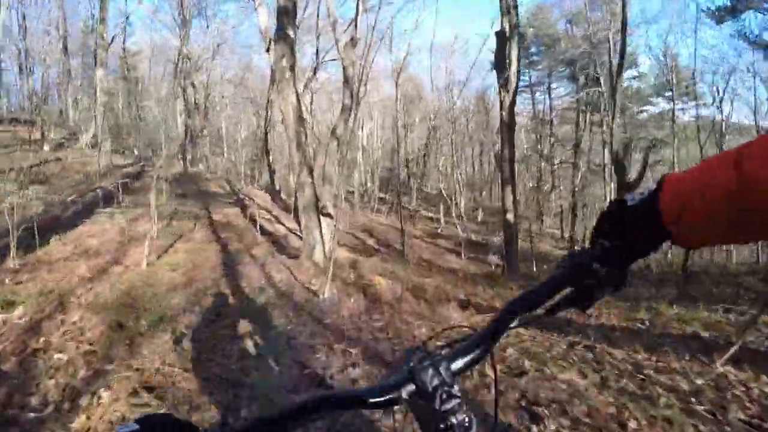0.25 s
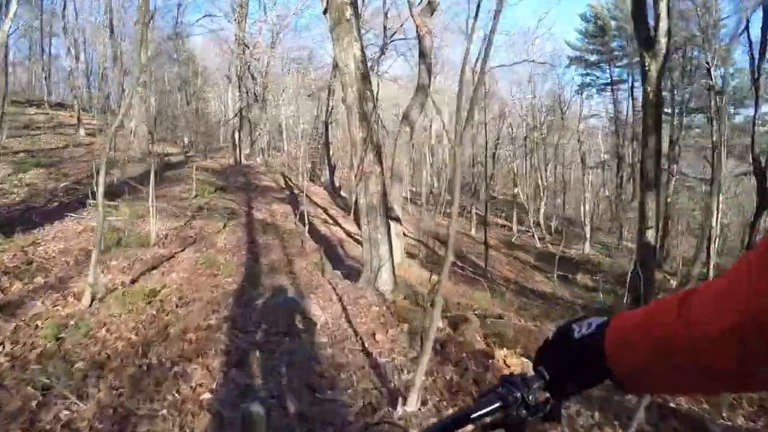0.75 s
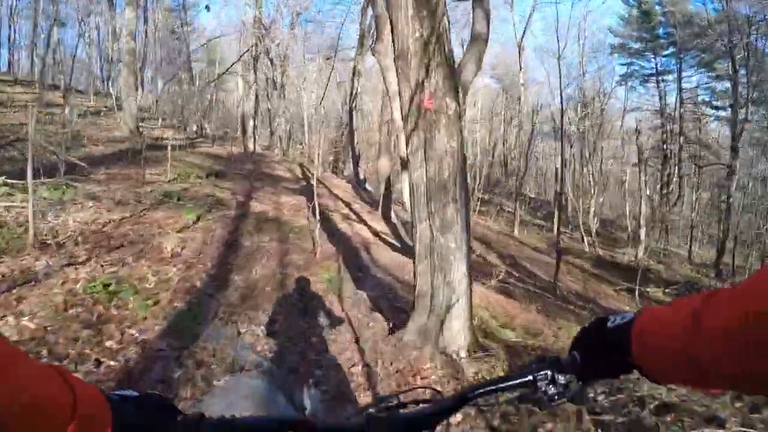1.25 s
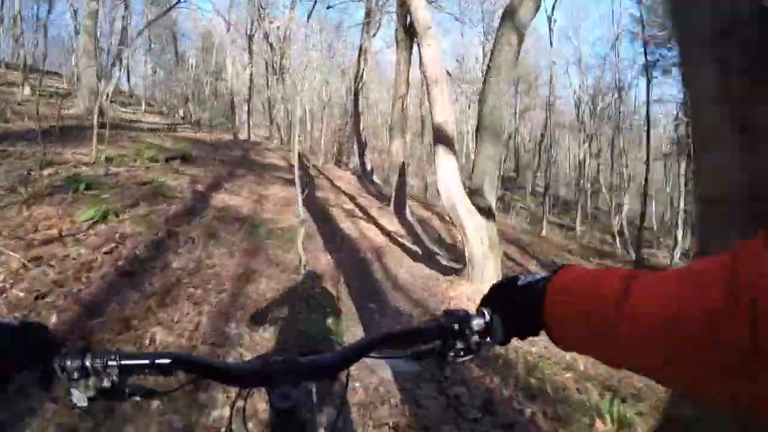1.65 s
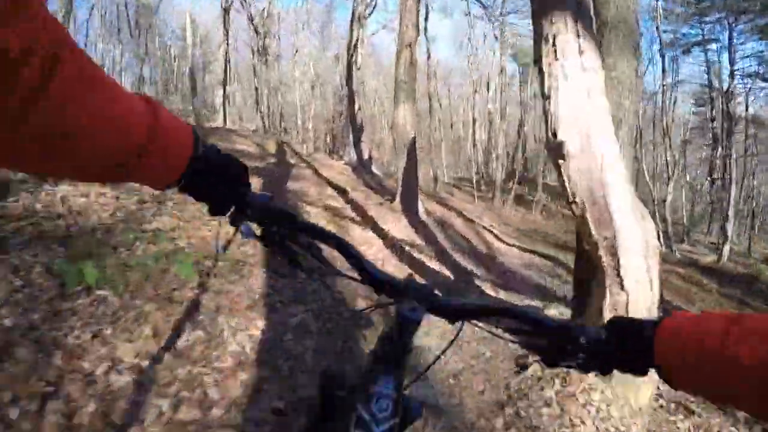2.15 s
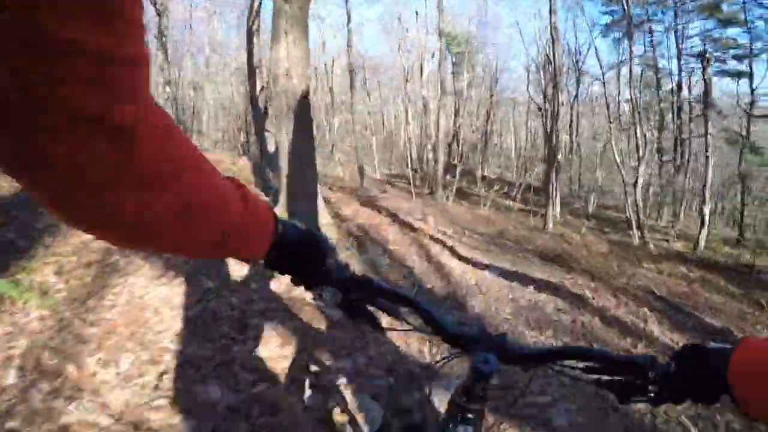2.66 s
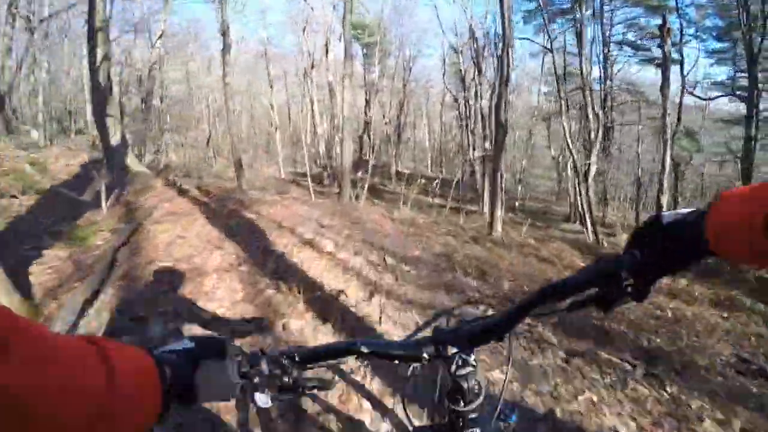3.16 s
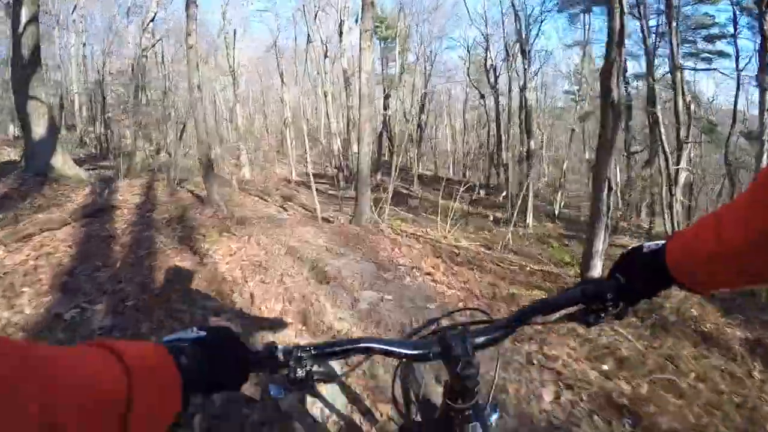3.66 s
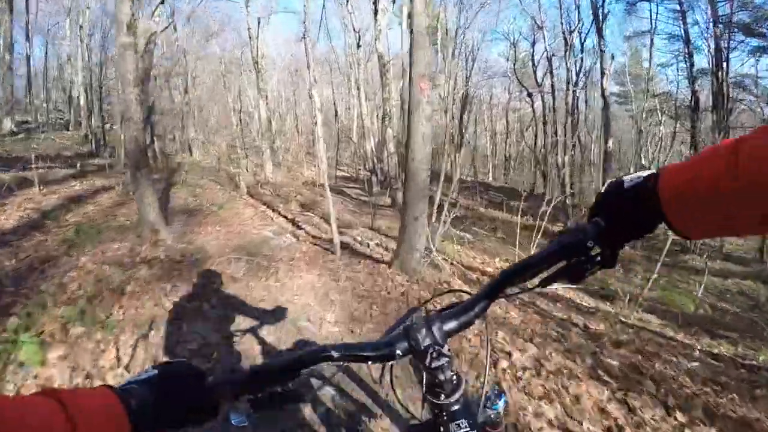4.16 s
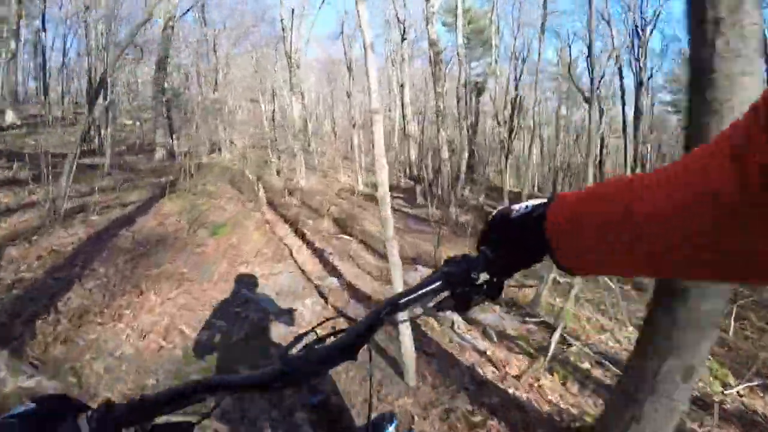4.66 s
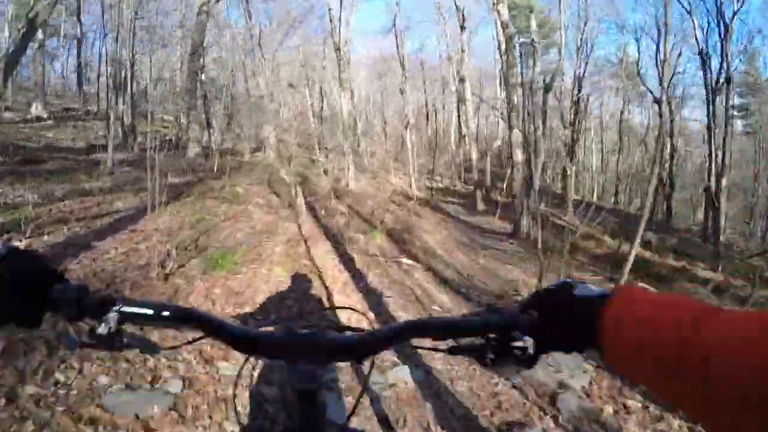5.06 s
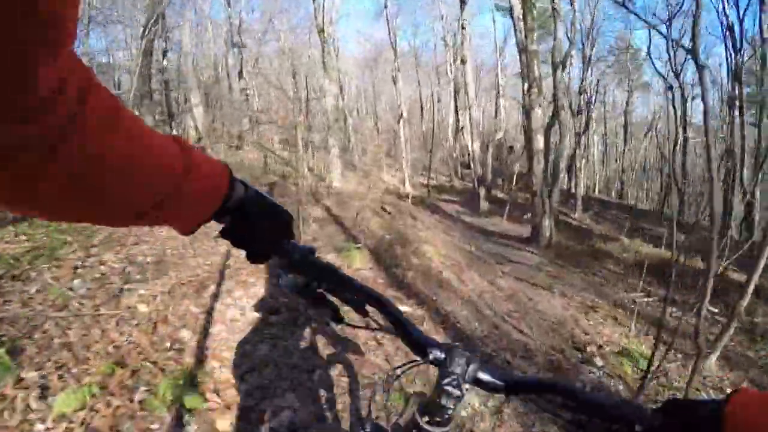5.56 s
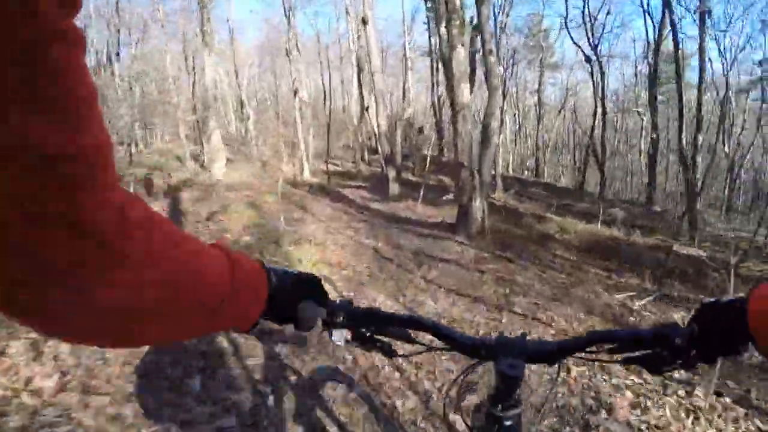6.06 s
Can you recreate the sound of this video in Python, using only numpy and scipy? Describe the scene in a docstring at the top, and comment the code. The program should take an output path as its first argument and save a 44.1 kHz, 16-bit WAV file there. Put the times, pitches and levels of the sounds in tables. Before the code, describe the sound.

A mountain bike runs fast down a leaf-covered forest trail, heard close up from the rider's chest. Gusty wind rumbles on the microphone while the tyres drum on soil and crunch dry leaves over a faint hub whirr. Roots bring thumps, chain slaps and snapping twigs, building to one hard, cracking landing about halfway. The ride briefly smooths out, then turns rough and rattly again.

```python
"""A mountain bike runs fast down a leaf-covered dirt trail, heard from the rider's chest.
From the start wind buffets the microphone, tyres drum on soil and crunch dry leaves, the hub whirrs.
A cable buzzes at 0.3 s. From 2 s roots thump the frame more often, the chain slaps and twigs snap.
At 3.1 s a hard landing cracks the rim on a root and overloads the microphone.
The jolts thin out after 4 s; a second rough stretch runs from 5.1 s to the end."""
import sys
import numpy as np
from scipy import signal
from scipy.fft import rfft, irfft, next_fast_len
from scipy.io import wavfile
from scipy.ndimage import uniform_filter1d

SR = 44100
rng = np.random.default_rng(int(sys.argv[2]) if len(sys.argv) > 2 else 0)


def master_out(mix):
    """Clip the mix to full scale and print it as 16-bit PCM to the path in sys.argv[1]."""
    frames = np.transpose(np.atleast_2d(mix))
    ceiling = np.clip(frames, -1, 1)
    pcm = np.round(ceiling * 32767).astype(np.int16)
    wavfile.write(sys.argv[1], SR, pcm)


N = 277830
CUTOFF_HZ = 15600
# roots and ruts: t/s, level/dB, f/Hz, fade/cycles
THUMP_EVENTS = [(0.067, -18, 404, 0.83), (0.09, -22, 380, 0.49), (0.2002, -12, 415, 0.68),
                (0.4257, -20, 326, 0.38), (1.483, -21, 301, 0.58), (1.575, -19.5, 417, 0.21),
                (2.0868, -17.5, 414, 0.85), (2.15, -18, 328, 0.6), (2.23, -15.5, 324, 0.33),
                (2.403, -27, 330, .5), (2.514, -18.5, 455, 0.49), (2.5453, -13, 374, 0.51),
                (2.726, -18, 260, 0.39), (2.7323, -10.5, 337, 0.6), (2.899, -15.5, 294, 0.59),
                (2.921, -18, 325, 0.85), (2.9285, -13, 287, 0.65), (3.079, -12.5, 288, 0.61),
                (3.094, -22, 280, .7), (3.1019, 1, 380, 0.24), (3.112, -9.5, 426, 0.3),
                (3.133, -19, 377, .5), (3.144, -14, 300, 0.41), (3.256, -12, 350, 0.3),
                (3.3511, -17.5, 277, 0.8), (3.4228, -13.5, 400, 0.71), (3.5451, -16.5, 270, 0.35),
                (3.663, -17.5, 293, 0.35), (3.757, -22, 330, 0.22), (3.8835, -14, 305, 0.63),
                (3.974, -15.5, 426, .45), (4.186, -21.5, 284, .5), (4.336, -20.5, 277, 0.41),
                (4.625, -16, 220, 0.43), (5.0876, -16.5, 295, 0.88), (5.106, -20, 470, 1),
                (5.159, -23, 380, 0.41), (5.2351, -11.5, 426, 0.44), (5.4035, -17.5, 340, 0.91),
                (5.431, -17, 393, 0.59), (5.475, -22, 420, 0.98), (5.522, -16, 305, 0.91),
                (5.5896, -17.5, 430, 0.7), (5.5956, -11, 520, 0.37), (5.661, -21.5, 303, 0.45),
                (5.845, -26, 316, 0.49), (6.109, -14.5, 267, 0.22), (6.121, -18.5, 377, 0.46),
                (6.205, -20.5, 507, 0.98), (6.2129, -9.5, 375, 0.28), (6.249, -20, 383, 0.38)]


def wind():
    """Slow eddies and fast flutter on the microphone; gusts lift both, jolts stir the flutter."""
    airflow = [(0.0, -24, -30), (0.45, -33, -31.5), (0.68, -21.5, -25.5), (0.8, -33, -32), (1.3, -24, -27),
               (1.6, -25.5, -34.5), (2.0, -25.5, -25.5), (2.4, -24.5, -30.5), (2.85, -19, -25),
               (3.05, -23, -25.5), (3.3, -35, -30.5), (3.62, -24, -27.5), (4.25, -30, -41),
               (4.5, -25.5, -39), (4.93, -28.5, -34.5), (5.35, -23, -31), (5.5, -25.5, -35),
               (5.85, -28, -30.5), (6.3, -26, -28.5)]  # between gusts: t/s, eddy level/dB, flutter level/dB
    gusts = [(0.09, -34, -17.5), (0.33, -16.5, -23.5), (0.49, -18, -28), (0.6, -14, -27.5),
             (0.85, -23.5, -38), (1.065, -19, -39), (1.25, -31, -32), (1.31, -24, -26), (1.73, -26, -23),
             (1.9, -15.5, -22), (2.1, -16, -36), (2.16, -16, -41), (2.25, -19.5, -21.5), (2.37, -12.5, -21),
             (2.44, -29, -18), (2.51, -10, -20), (2.61, -13.5, -41), (2.79, -11.5, -54),
             (3.135, -17.5, -19), (3.68, -26, -43), (3.81, -37, -21.5), (4.02, -19, -27),
             (4.635, -12, -20.5), (4.72, -12, -28), (5.0, -20, -43), (5.31, -29, -19), (5.72, -13, -40),
             (6.22, -30, -23)]  # gust peaks: t/s, eddy level/dB, flutter level/dB
    eddy_colour = [(12, -8.5), (22, 4.5), (32, -1.5), (46, -1), (62, -33), (100, -17.5), (300, -105)]  # spectrum: f/Hz, level/dB
    flutter_colour = [(30, -25), (48, 6.5), (62, 6), (80, -2), (110, -10.5), (160, -16), (320, -30.5),
                      (900, -58.5)]  # spectrum: f/Hz, level/dB
    eddy_db, flutter_db = in_time(airflow)
    gust_s, gust_eddy_db, gust_flutter_db = np.transpose(gusts)
    thump_s, thump_db, *_ = np.transpose(THUMP_EVENTS)
    jolts = swells(thump_s, -19 + 0.71 * thump_db, length_s=0.038)
    eddy_gusts = swells(gust_s, gust_eddy_db, length_s=0.045)
    flutter_gusts = swells(gust_s, gust_flutter_db, length_s=0.045)
    eddy = np.sqrt(from_db(eddy_db + 0.55 * drift(11)) ** 2 + eddy_gusts)
    flutter = np.sqrt(from_db(flutter_db + 2.5 * drift(8.3)) ** 2 + flutter_gusts + jolts)
    return eddy * buffeting(eddy_colour) + flutter * buffeting(flutter_colour)


def buffeting(colour):
    """Eddies shed by the rider push on the microphone in even lumps; rms near 1."""
    eddies = coloured(rng.standard_normal(N), colour)
    return eddies / np.sqrt(uniform_filter1d(eddies ** 2, size=3000) + 1e-6)


def leaves():
    """Dry leaves break in clumps; some fractures are broadband, others sound in one band."""
    litter = [(0.0, -37, -2), (0.3, -35, -2.5), (0.6, -40, 1), (1.0, -39.5, -4.5), (1.4, -36.5, -1.5),
              (2.03, -32.5, 2), (2.35, -37.5, 1.5), (2.56, -32.5, -9), (2.82, -35, -3), (3.08, -28.5, 0),
              (3.36, -34, -1.5), (3.52, -36, 2), (3.7, -31, 3.5), (3.85, -31, 0), (4.25, -36, -2.5),
              (4.58, -36.5, 0), (4.75, -42, 0), (5.38, -35, 0.5), (5.55, -36.5, 3), (5.9, -35, -0.5),
              (6.3, -33, 0)]  # packed leaves: t/s, level/dB, treble boost/dB
    leaf_colour = [(350, 13), (750, 4.5), (980, -0.5), (1320, 7), (1720, 2.5), (2150, 4.5), (3400, 0.5),
                   (5500, -0.5), (6500, -3.5), (7400, -3), (9000, -8), (11500, -12.5), (13200, -10.5),
                   (15500, -20)]  # spectrum: f/Hz, level/dB
    crunch_db, crisp_db = in_time(litter)
    heap_power, heap_treble = leaf_heaps()
    clumps = from_db(1.62 * drift(24))
    broad = crackle(per_s=830, spread_db=2.5, fade_s=0.0019)
    hiss = [coloured(rng.standard_normal(N), leaf_colour) for _ in range(2)]
    edges_hz = np.geomspace(350, 17000, 15)
    out = np.zeros(N)
    for k, (low_hz, high_hz) in enumerate(zip(edges_hz, edges_hz[1:])):
        narrow = crackle(per_s=550, spread_db=3, fade_s=0.00064)
        fractures = hiss[k % 2] * np.sqrt((broad + narrow) / 2)
        centre_hz = np.sqrt(low_hz * high_hz)
        treble = np.clip(np.log(centre_hz / 2200) / np.log(7500 / 2200), 0, 1.3)
        litter_gain = from_db(crunch_db + treble * crisp_db)
        heap_gain = np.sqrt(heap_power * (heap_treble / heap_power) ** treble)
        out += band_pass(fractures, low_hz, high_hz) * np.hypot(litter_gain, heap_gain)
    return ground_contact() * clumps * out


def leaf_heaps():
    """Crunch power and treble power as a wheel sinks into a heap and the leaves settle."""
    heaps = [(0.184, -31, 0.025, 2.5), (1.718, -35.5, .05, -4), (1.823, -36, 0.025, 6),
             (1.876, -34, 0.023, 2.5), (1.91, -32.5, 0.04, 4.5), (1.965, -29, 0.098, 2.5),
             (2.077, -33, 0.047, 7.5), (2.143, -30.5, 0.035, 7), (2.218, -27, 0.052, 4),
             (2.307, -25.5, 0.022, -8), (2.385, -26.5, 0.023, 1), (2.433, -30.5, 0.053, 5.5),
             (2.586, -28.5, 0.045, -2), (2.701, -25.5, 0.061, 3.5), (2.847, -25.5, 0.031, 3.5),
             (2.887, -25.5, 0.022, 3.5), (2.913, -29, 0.032, -2), (2.995, -25.5, 0.027, 4),
             (3.115, -34, 0.042, 4), (3.154, -29, 0.014, 4), (3.221, -21.5, 0.017, -1),
             (3.452, -25, 0.024, -3.5), (3.552, -47, .03, 16.5), (3.621, -36, .05, 7),
             (3.649, -28, 0.028, 5), (3.68, -37, 0.062, 6), (3.746, -29, .03, 5.5), (3.924, -40, 0.042, 6),
             (4.102, -31, 0.029, 6), (5.053, -36.5, 0.058, 5), (5.429, -28.5, 0.046, 3.5),
             (5.57, -28.5, 0.038, -4), (5.76, -33.5, 0.044, 3.5), (5.823, -34, 0.026, 3.5),
             (5.992, -33.5, 0.032, 3.5), (6.066, -33, .075, 2.5)]  # leaf heaps: t/s, level/dB, length/s, treble boost/dB
    power, treble_power = np.full(N, 1e-12), np.full(N, 1e-12)
    for s, db, length_s, crisp_db in heaps:
        age = np.arange(SR // 4) / SR / (length_s / 2)
        press = (from_db(db) * 2 * age ** 2 / (1 + age ** 4)) ** 2
        add(power, s, press)
        add(treble_power, s, press * from_db(crisp_db) ** 2)
    return power, treble_power


def ground_contact():
    """Crunch gain; dips as the tyres skim a hollow."""
    skims = [(2.2, 0.03), (2.36, 0.036), (2.656, 0.03), (2.814, 0.015), (2.987, 0.033), (3.38, 0.026),
             (3.83, 0.13), (4.099, 0.042), (4.27, 0.046), (4.69, 0.023), (5.272, 0.048), (5.384, 0.025),
             (5.427, 0.017), (5.887, 0.045), (5.972, 0.02)]  # hollows: mid t/s, length/s
    mid_s, length_s = np.transpose(skims)
    return from_db(-6.5 * swells(mid_s, 0, length_s))


def tyre_roll():
    """Knobs strike lumps of soil; casing and frame drum with them."""
    roll = [(0.0, -33.5), (0.2, -31), (0.46, -41.5), (0.8, -40), (1.9, -34.5), (2.45, -34), (3.12, -30.5),
            (3.47, -35.5), (3.88, -32), (4.05, -35.5), (4.5, -35.5), (4.77, -41.5), (5.0, -45.5),
            (5.2, -31), (5.35, -34.5), (5.85, -36), (6.3, -32.5)]  # drumming: t/s, level/dB
    roll_colour = [(70, -3), (120, 5.5), (180, 5.5), (260, 7), (400, -2), (550, -3), (750, -15.5),
                   (1100, -14.5), (2500, -42)]  # spectrum: f/Hz, level/dB
    level_db, = in_time(roll)
    knocks = grains(per_s=900, spread_db=3.5) * rng.choice([-1, 1], N)
    return from_db(level_db + 0.53 * drift(7.7)) * coloured(knocks, roll_colour)


def thumps():
    """The tyre folds over a root in one damped pulse and judders; the frame rings faintly."""
    frame_modes = [(149, 69, -6), (197, 73, 0), (260, 49, 3), (330, 74, -26), (446, 48, 4.5),
                   (526, 58, -7.5), (645, 63, -33)]  # frame resonances: f/Hz, width/Hz, level/dB
    ring_db, judder_db, tyre_cushion_hz = -23.5, -15.5, 1680
    pulses, t = np.zeros(N), np.arange(SR // 20) / SR
    for s, db, hz, fade_cycles in THUMP_EVENTS:
        age = t * hz / fade_cycles
        add(pulses, s, from_db(db) * age * np.exp(1 - age) * np.sin(2 * np.pi * hz * t))
    thump_s, thump_db, *_ = np.transpose(THUMP_EVENTS)
    contacts = grains(per_s=1500, spread_db=0.5) * rng.choice([-1, 1], N)
    judder_power = swells(thump_s, thump_db + judder_db, length_s=0.015)
    judder = rms_one(resonate(contacts, frame_modes)) * np.sqrt(judder_power)
    body = pulses + from_db(ring_db) * resonate(pulses, frame_modes) + judder
    return signal.sosfilt(signal.butter(2, tyre_cushion_hz, fs=SR, output="sos"), body)


def landing():
    """The rim bottoms out and rebounds; high bending waves run faster, so each crack falls in pitch."""
    impacts = [(3.1012, 1.5, 4900, 260, .0023), (3.1106, -7, 3800, 600, .0027)]  # rim on root: t/s, level/dB, start f/Hz, end f/Hz, sweep/s
    rim_modes = [(500, 280, 2), (1250, 150, -17), (2150, 170, -3), (2500, 140, -26), (3480, 110, -17),
                 (4400, 200, -36)]  # rim and spoke resonances: f/Hz, width/Hz, level/dB
    crack_fade_s, grind_fade_s, grind_db, tyre_cushion_hz = 0.0032, 0.005, -12, 5400
    out, t = np.zeros(N), np.arange(SR // 30) / SR
    envelope = np.sqrt(t) * np.exp(-(t / crack_fade_s) ** 2)
    envelope /= envelope.max()
    for s, db, start_hz, end_hz, sweep_s in impacts:
        ragged = rms_one(uniform_filter1d(rng.standard_normal(len(t)), size=12))
        sweep_hz = end_hz + (start_hz - end_hz) * np.exp(-(t / sweep_s) ** 1.4)
        cycles = np.cumsum(sweep_hz * np.exp(0.25 * ragged)) / SR
        add(out, s, from_db(db) * envelope * np.sin(2 * np.pi * cycles))
        grind = rms_one(band_pass(rng.standard_normal(len(t)), 700, 4200))
        add(out, s, from_db(db + grind_db) * grind * np.exp(-t / grind_fade_s))
    wheel = 0.45 * out + resonate(out, rim_modes)
    return signal.sosfilt(signal.butter(6, tyre_cushion_hz, fs=SR, output="sos"), wheel)


def chain_slaps():
    """Chain and cables slap the frame."""
    slaps = [(0.1166, -5, 1580), (0.277, -16, 2900), (0.638, -15.5, 2670), (2.148, -12.5, 1500),
             (2.228, -18, 1200), (2.2528, -8.5, 3570), (2.368, -14, 1400), (2.394, -9, 2300),
             (2.495, -8, 1370), (2.514, -24, 950), (2.523, -19, 1370), (2.535, -23, 1250),
             (2.549, -25, 1500), (3.0734, -4, 1230), (3.1383, -13, 1400), (3.187, -13, 2400),
             (3.255, -15, 1300), (3.3456, -18, 1330), (3.4598, -16, 1500), (3.803, -13, 1340),
             (3.8816, -14, 1260), (4.37, -16, 1350), (4.4276, -17, 2320), (5.1264, -12, 1350),
             (5.1367, -2.5, 1350), (5.2072, -5, 1250), (5.2144, -11, 1300), (5.2277, -6, 1200),
             (5.2712, -14, 2200), (5.329, -15, 1100), (5.4545, -17, 2320), (5.579, -11.5, 2020),
             (5.5945, -11, 1150), (5.6326, -14, 1350), (5.7768, -19, 1920), (6.167, -12, 2190),
             (6.1737, -9, 2380)]  # blows: t/s, relative level/dB, centre f/Hz
    chain_modes = [(1070, 3, 0.011), (1370, 6, 0.0082), (1500, -7, 0.027), (1950, -3, 0.011),
                   (2270, -0.5, 0.02), (2405, -2.5, 0.028), (3220, -11, 0.016), (3480, -7, .012),
                   (4010, -1.5, 0.019), (5270, -7, .01)]  # resonances: f/Hz, level/dB, t60/s
    return from_db(-15.5) * blows(slaps, chain_modes, focus_octaves=0.75, scatter_db=1.2,
                                  grind_gain=0.7, grind_s=0.0023, knock_gain=0.6)


def twigs_and_grit():
    """Twigs snap and grit ticks on metal."""
    ticks = [(0.638, -25, 3200), (2.0174, -13, 4960), (2.493, -4.5, 6000), (2.8864, -12, 4980),
             (2.9435, 0, 4700), (2.9662, -6, 9550), (3.3752, -5.5, 4900), (3.8931, -3, 4870),
             (4.0957, -9, 4400), (4.152, -8, 4800), (4.229, -14, 7060), (4.4583, -15, 5840),
             (5.2145, -8.5, 5710), (5.2723, 0.5, 4000), (5.4016, -7, 4550), (5.469, -2.5, 4800),
             (5.5945, -17, 3400)]  # snaps and ticks: t/s, relative level/dB, centre f/Hz
    grit_modes = [(2740, 30.5, 0.0036), (3030, -5, 0.0035), (4000, 7.5, 0.0048), (4570, -9, 0.0084),
                  (5710, 1.5, 0.0044), (7060, 0, 0.0084), (7000, -23, 0.0033), (9250, 2, 0.0093),
                  (11300, -22, .005), (13400, -17, .004)]  # resonances: f/Hz, level/dB, t60/s
    return from_db(-22) * blows(ticks, grit_modes, focus_octaves=0.36, scatter_db=1.5,
                                grind_gain=1, grind_s=0.0024, knock_gain=0.42)


def blows(events, modes, focus_octaves, scatter_db, grind_gain, grind_s, knock_gain):
    """Each grinding contact favours the modes near its pitch and is also heard as a dry knock."""
    out, t = np.zeros(N), np.arange(SR // 14) / SR
    hz, mode_db, t60_s = np.transpose(modes)
    signs = (-1) ** np.arange(len(hz))
    decays = from_db(-60 * t / t60_s[:, None])
    for s, db, centre_hz in events:
        level_scatter, pitch_scatter = rng.standard_normal((2, len(hz)))
        focus = 1 / (1 + (np.log2(hz / centre_hz) / focus_octaves) ** 2) ** 2
        gains = signs * focus * from_db(mode_db + scatter_db * level_scatter)
        pitch_hz = hz * np.exp(0.028 * pitch_scatter)  # load detunes the parts
        ring = gains @ (np.sin(2 * np.pi * pitch_hz[:, None] * t) * decays)
        grind = rng.standard_normal(len(t)) * np.sqrt(t) * np.exp(-t / grind_s)
        contact = (t == 0) + grind_gain * grind / np.linalg.norm(grind)
        knock = band_pass(contact, 0.58 * centre_hz, min(1.7 * centre_hz, CUTOFF_HZ))
        sound = rms_one(signal.fftconvolve(contact, ring)[:len(t)]) + knock_gain * rms_one(knock)
        crest = np.sqrt(2 * uniform_filter1d(sound ** 2, size=260).max())
        add(out, s, from_db(db) * sound / crest)
    return out


def clatter():
    """Links, cables and fittings collide in dense bursts as the bike shakes."""
    bursts = [(2.159, -32, 0.016), (2.529, -27, 0.024), (2.732, -30.5, .02), (2.927, -33, 0.031),
              (3.117, -23, 0.0087), (3.156, -26, 0.023), (3.941, -28.5, 0.015), (4.03, -37, 0.047),
              (5.09, -35, 0.028), (5.232, -35, 0.018), (5.469, -34, .035), (5.588, -25, 0.0084),
              (5.643, -35, 0.03)]  # shakes: mid t/s, level/dB, length/s
    clatter_colour = [(200, 2), (450, 12), (750, 2.5), (1000, -1), (1330, 5), (1750, 0), (2200, -1),
                      (3000, -6), (5000, -15), (9000, -40)]  # spectrum: f/Hz, level/dB
    contacts = grains(per_s=1700, spread_db=4.5) * rng.choice([-1, 1], N)
    return np.sqrt(swells(*np.transpose(bursts))) * coloured(contacts, clatter_colour)


def drivetrain():
    """Fast pawl ticks and jingling chain links ring the coasting hub."""
    whirr = [(0, -39.5), (0.3, -47), (0.42, -49), (0.65, -46.5), (1.2, -46.5), (1.8, -48.5), (4.3, -54),
             (5.4, -51), (6.3, -50)]  # hub and chain: t/s, level/dB
    hub_modes = [(1400, 260, 8.5), (2100, 160, 2.2), (2560, 140, 8.3), (2756, 120, 12), (2950, 240, 13.7),
                 (3920, 105, 9.7), (7450, 720, 2), (9150, 1800, 1.1)]  # hub resonances: f/Hz, width/Hz, level/dB
    level_db, = in_time(whirr)
    pawl_hz = 220 * np.exp(0.06 * drift(2.2))
    pawls = pulse_train(pawl_hz) * from_db(6.4 * drift(69))
    drive = 0.59 * rms_one(pawls) + rng.standard_normal(N)
    chain_sway_db = 2.54 * drift(29)
    return from_db(level_db + chain_sway_db) * rms_one(resonate(drive, hub_modes))


def cable_buzz():
    """A loose cable hits the bars in a quick, uneven run that dies away."""
    cable_modes = [(1390, 140, -3), (2550, 74, 0), (2900, 64, 5), (2970, 68, 1), (4870, 90, -5)]  # resonances: f/Hz, width/Hz, level/dB
    start_s, level_db, fade_s = 0.277, -39, 0.074
    age_s = np.arange(N) / SR - start_s
    contact_hz = 230 * np.exp(0.13 * drift(60))
    contacts = pulse_train(contact_hz) * from_db(1.7 * drift(90))
    envelope = (age_s > 0) * np.exp(-np.abs(age_s) / fade_s)
    return from_db(level_db) * envelope * rms_one(resonate(contacts, cable_modes))


def from_db(db):
    """Decibels to gain."""
    return 10 ** (np.asarray(db) / 20)


def rms_one(x):
    """Scale to unit power."""
    return x / np.sqrt(np.mean(x ** 2) + 1e-20)


def in_time(rows):
    """Each column of a time curve, per sample."""
    s, *columns = np.transpose(rows)
    return [np.interp(np.arange(N) / SR, s, column) for column in columns]


def add(track, s, sound):
    """Mix a sound in at s seconds."""
    at = max(0, round(s * SR))
    track[at:at + len(sound)] += sound[:max(0, N - at)]


def coloured(x, colour):
    """Apply a spectrum, interpolated in log frequency; rms 1."""
    size = next_fast_len(N)
    bin_hz = np.arange(size // 2 + 1) * SR / size
    hz, db = np.transpose(colour)
    gain = from_db(np.interp(np.log(bin_hz + 1e-6), np.log(hz), db))
    return rms_one(irfft(rfft(x, size) * gain, size)[:N])


def band_pass(x, low_hz, high_hz):
    """Band filter, 12 dB/octave skirts."""
    return signal.sosfilt(signal.butter(2, [low_hz, high_hz], "band", fs=SR, output="sos"), x)


def resonate(x, modes):
    """Parallel resonators."""
    return sum(from_db(db) * signal.lfilter(*signal.iirpeak(hz, hz / width_hz, fs=SR), x + 1e-18)
               for hz, width_hz, db in modes)


def drift(rate_hz):
    """Smooth random wander; rms 1."""
    hop, settle = 40, 2000
    pole = np.exp(-2 * np.pi * rate_hz * hop / SR)
    noise = rng.standard_normal(N // hop + settle + 2)
    slow = signal.lfilter([1], [1, -2 * pole, pole * pole], noise)[settle:]
    return np.interp(np.arange(N) / hop, np.arange(len(slow)), rms_one(slow))


def pulse_train(hz):
    """One click per cycle."""
    return np.diff(np.floor(np.cumsum(hz) / SR), prepend=0)


def grains(per_s, spread_db):
    """Random contacts, many small, a few large."""
    born = rng.random(N) < per_s / SR
    return born * from_db(spread_db * np.minimum(rng.exponential(1, N), 4.5))


def crackle(per_s, spread_db, fade_s):
    """Power of brittle fractures that swell fast and fade; mean 1."""
    pole = np.exp(-1 / (fade_s * SR))
    power = signal.lfilter([1], [1, -2 * pole, pole * pole], grains(per_s, spread_db) ** 2 + 1e-18)
    return power / power.mean()


def swells(times_s, levels_db, length_s):
    """Power of bell-shaped swells, each centred on its time."""
    power, t = np.zeros(N), np.arange(N) / SR
    for s, db, width_s in np.broadcast(times_s, levels_db, length_s):
        near = slice(max(0, int(s * SR) - SR // 4), int(s * SR) + SR // 4)
        power[near] += from_db(db) ** 2 * np.exp(-(2 * (t[near] - s) / width_s) ** 2)
    return power


def scene():
    """Wind, tyres and the rattling bike, close up; mono."""
    hits = chain_slaps() + twigs_and_grit()
    riding = wind() + tyre_roll() + leaves() + drivetrain()
    jolts = cable_buzz() + thumps() + clatter() + landing()
    return (hits + riding + jolts)[None]


def record(dry):
    """Soft overload on the hardest peaks, then a steep low-pass."""
    ceiling = 0.93
    limited = dry / (1 + (dry / ceiling) ** 6) ** (1 / 6)
    return signal.sosfilt(signal.ellip(12, 0.1, 80, CUTOFF_HZ, fs=SR, output="sos"), limited)


dry = scene()
out = record(dry)
master_out(out)
```